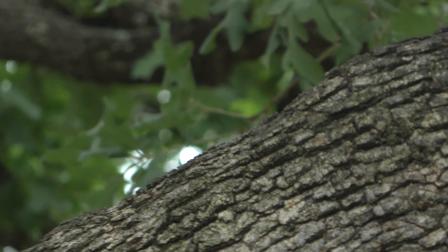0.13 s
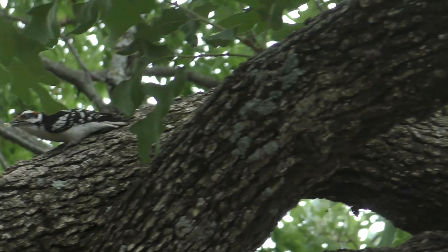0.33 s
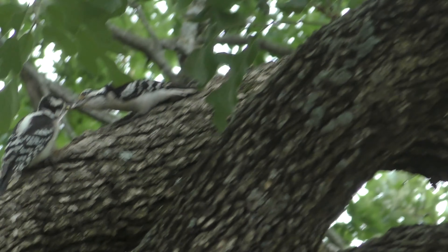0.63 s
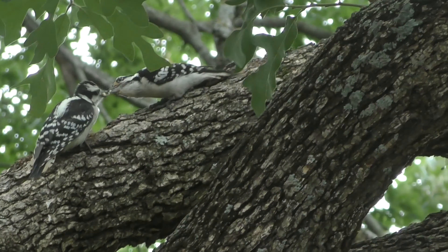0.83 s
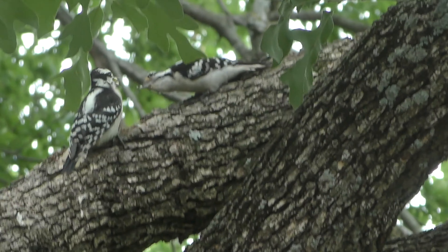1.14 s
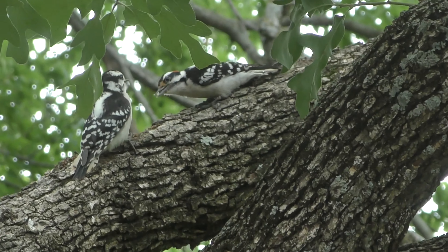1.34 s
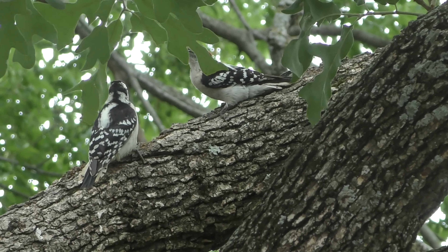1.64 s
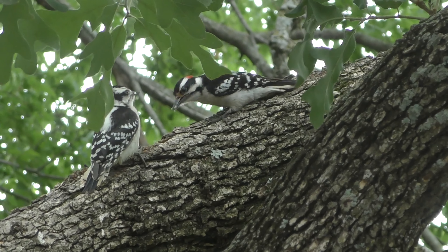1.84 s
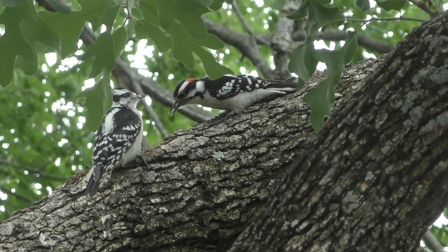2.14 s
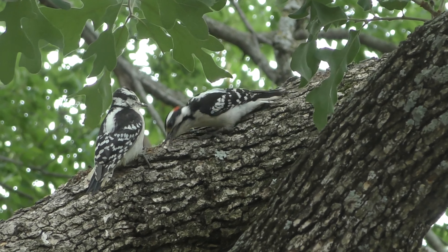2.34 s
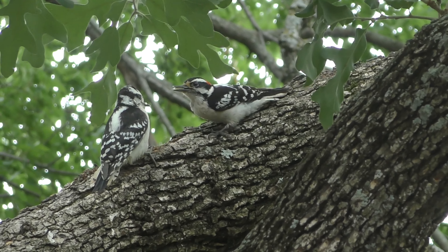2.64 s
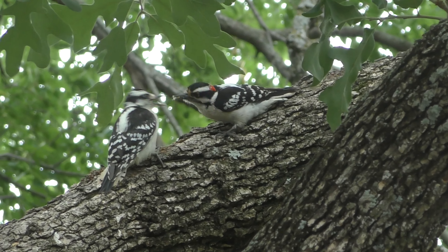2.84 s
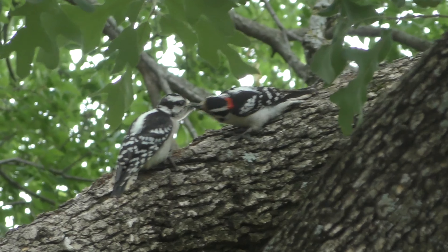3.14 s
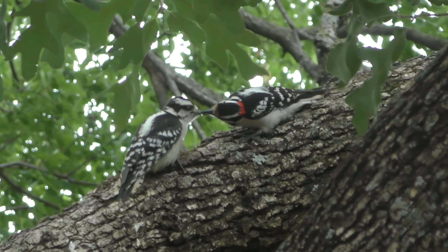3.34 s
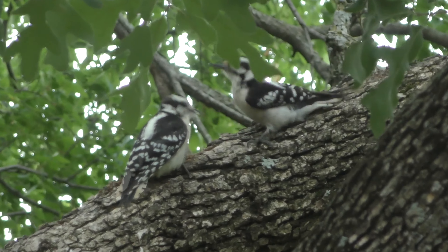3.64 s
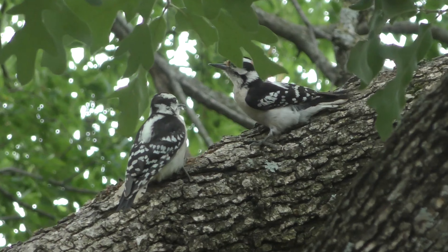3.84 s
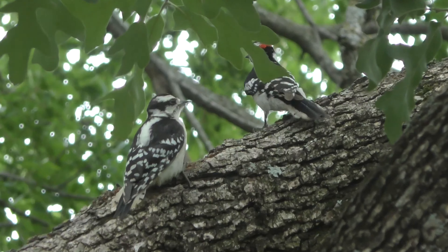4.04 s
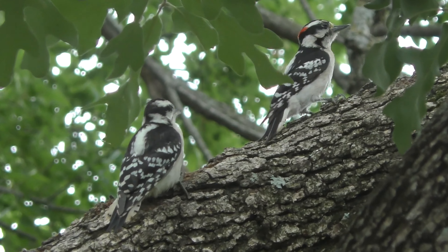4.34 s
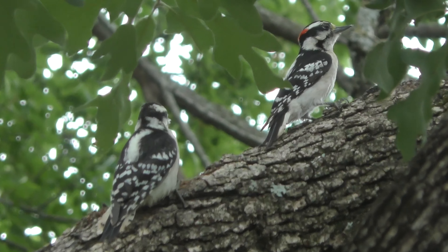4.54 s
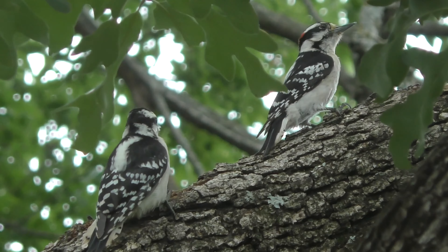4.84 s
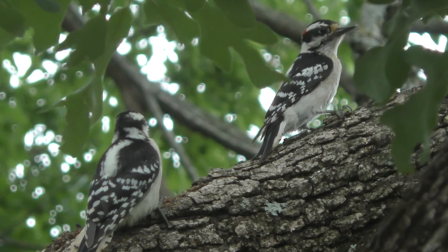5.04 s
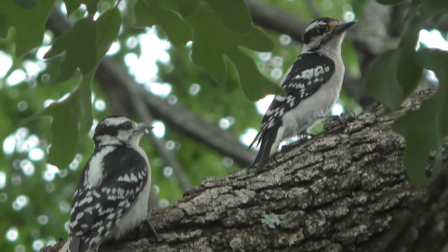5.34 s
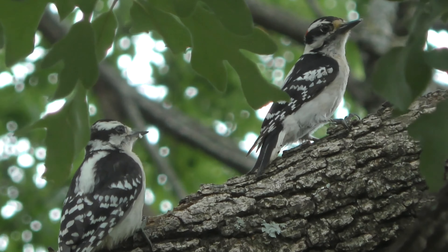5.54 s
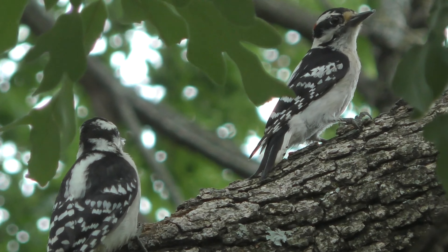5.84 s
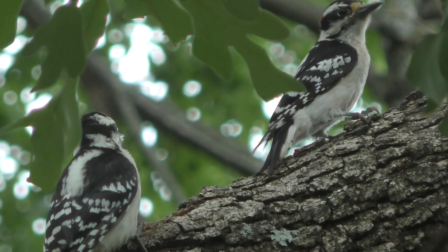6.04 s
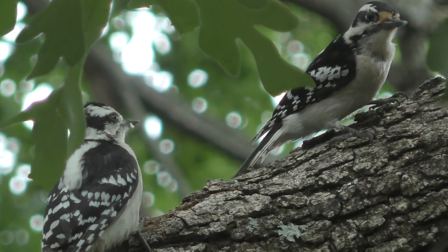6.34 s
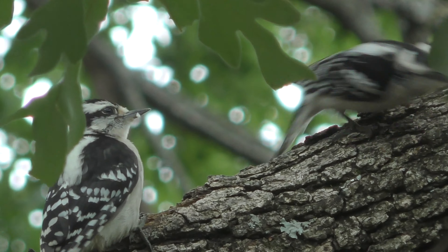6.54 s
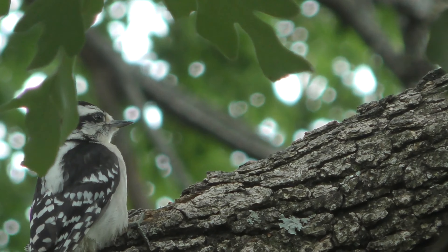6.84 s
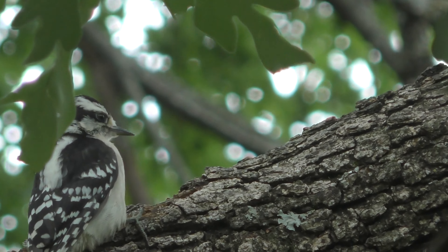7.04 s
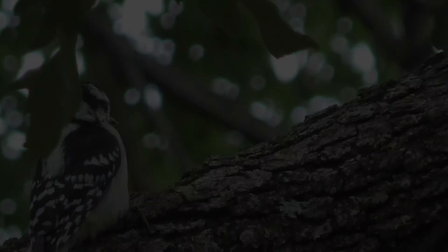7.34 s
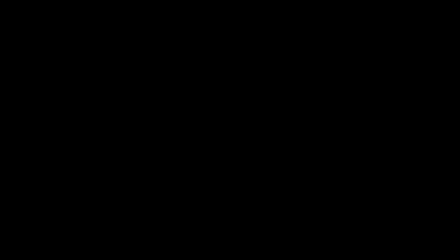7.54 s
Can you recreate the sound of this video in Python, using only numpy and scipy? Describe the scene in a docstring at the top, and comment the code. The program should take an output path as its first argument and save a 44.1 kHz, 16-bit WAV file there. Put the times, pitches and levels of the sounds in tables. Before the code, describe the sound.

Outdoors in a leafy tree, a young woodpecker begs with very short, high, arched chirps, many opening with a rough squeak. They come irregularly, crowd together near the middle, then grow sparser and weaker. A songbird farther off to the right whistles quick rising slurs, mostly near the end. Low murmur, leaf rustle and a faint machine hum lie behind; the handled camera clicks twice.

```python
"""Begging young woodpecker

A young woodpecker begs on an oak limb: short arched harmonic chirps, many opening with a rough squeak,
scattered by trunk and leaves. Farther off to the right a songbird whistles rising sine slurs. Thin buzzy
notes are frequency-modulated sines; the first is the falling end of the fledgling's opening chirp.
A distant machine's hum lines lie under shaped-noise outdoor air; the camera clicks twice as it is
handled, each time as noise cracks and case resonances."""
import sys
import numpy as np
from scipy import signal
from scipy.fft import rfft, irfft, next_fast_len
from scipy.io import wavfile
from scipy.ndimage import map_coordinates

SR = 44100
rng = np.random.default_rng(int(sys.argv[2]) if len(sys.argv) > 2 else 0)


def unload_wav(signal):
    """Save mono or channel-first audio to the path in sys.argv[1] as 16-bit WAV at rate SR, clipped to [-1, 1]."""
    wavfile.write(
        sys.argv[1],
        SR,
        np.round(np.clip(np.atleast_2d(signal).T, -1, 1) * 32767).astype(np.int16),
    )


N = 339570  # length in samples


def amp(db):
    """Level law: decibels to amplitude gain."""
    return 10 ** (np.asarray(db) / 20)


def unit(x):
    """Normalization: scale a signal to rms 1."""
    return x / np.sqrt(np.mean(x ** 2) + 1e-20)


def along(points, hz):
    """Interpolation of (frequency, value) points along a logarithmic frequency axis."""
    f, v = np.transpose(points)
    return np.interp(np.log(hz + 1), np.log(f + 1), v)


def curves(rows):
    """Interpolation in time: one value per sample for each column after the time."""
    s, *cols = np.transpose(rows)
    return [np.interp(np.arange(N) / SR, s, c) for c in cols]


def wobble(rate, size=N):
    """Band-limited fluctuation: a smooth random curve through rate knots a second."""
    knots = rng.standard_normal(int(size * rate / SR) + 4)
    return map_coordinates(knots, [np.arange(size) * rate / SR])


def filtered(x, response):
    """Linear filtering: the spectrum times a response of frequency."""
    m = next_fast_len(N + SR // 2)
    spectrum = rfft(x, m) * response(np.fft.rfftfreq(m, 1 / SR))
    return irfft(spectrum, m)[..., :N]


def pan(left_db):
    """Interchannel level difference: two gains, the left above the right by left_db."""
    return amp([[left_db / 2], [-left_db / 2]])


def add(track, s, sound):
    """Superposition: mix a sound into a track at time s."""
    part = track[max(round(s * SR), 0):][:len(sound)]
    part += sound[:len(part)]


def scatter(x, t60, width):
    """Diffuse scattering: dense decaying echoes off bark and leaves; width is their side share."""
    t = np.arange(SR // 2) / SR
    envelope = amp(-60 * t / t60) * (1 - np.exp(-t / 0.0042))
    tails = rng.standard_normal((2, len(t))) * envelope
    tails /= np.linalg.norm(tails[0])  # the mid tail has energy 1
    mid, side = signal.fftconvolve(x[None], tails, axes=1)[:, :N]
    return np.array([mid + width * side, mid - width * side]) / np.hypot(1, width)


def warble(length, centre_hz, swing, rate):
    """Frequency modulation: a tone of about rms 1 whose pitch darts randomly about its centre."""
    pitch_hz = centre_hz * np.exp(swing * wobble(rate, int(length * SR) + 1))
    return np.sqrt(2) * np.sin(2 * np.pi * np.cumsum(pitch_hz) / SR)


def chirp(length, top_hz, bright_db):
    """Source and filter: a pitch leaps up, holds and drops, sweeping five harmonics through the throat."""
    # arch of one chirp: length_share, pitch_share (of top pitch), level_db (relative)
    arch_points = [(0, .8, -0.5), (.13, 0.96, -3), (.3, .98, 2.5), (.55, 0.99, 4), (.75, .99, 4),
                   (.88, .92, 2.5), (1, 0.74, -11)]
    # resonance of throat and open bill: frequency_hz, level_db
    throat = [(2200, 0), (2750, -14), (3100, -8.5), (4000, 6.5), (4800, 1.5), (5500, -3), (6200, -2.5),
              (7200, -2), (8200, -3.5), (9300, -6.5), (10600, -16.5), (12400, -24.5), (14000, -42),
              (15500, -44)]
    jitter, flutter_db, leg_db = 0.012, 3.5, 9  # pitch share, level spread, purity of the arch's legs
    size = int(length * SR)
    u = np.linspace(0, 1, size)
    share, bend, swell_db = np.transpose(arch_points)
    arch = np.interp(u, share, bend)
    pitch_hz = top_hz * arch * (1 + jitter * wobble(1159, size))
    phase = 2 * np.pi * np.cumsum(pitch_hz) / SR
    # on the way up and down the second harmonic gains on the others
    purity_db = leg_db * (1 - arch)
    tone = np.zeros(size)
    for k in range(1, 6):
        harmonic_db = along(throat, k * pitch_hz) + bright_db * (k - 2) - purity_db * abs(k - 2)
        tone += amp(harmonic_db) * np.sin(k * phase)
    level_db = np.interp(u, share, swell_db) + flutter_db * wobble(287, size)
    return unit(tone * amp(level_db) * signal.windows.tukey(size, .08))


def squeak(length, db):
    """Random frequency modulation: a rough high squeak swells and dies away; a harder one is higher."""
    firm_hz, firm_db = 8270, -42.5  # centre pitch of a firm squeak, and its level
    rise = 0.022  # octaves per dB of effort
    tone = warble(length, firm_hz * 2 ** (rise * (db - firm_db)), swing=0.132, rate=1600)
    u = np.linspace(0, 1, len(tone))
    return tone * np.interp(u, [0, .2, .55, 1], [.05, 0.76, 1.24, 0.64])


def among_limbs(call, near_db, near_t60, far_db, far_t60, width):
    """Multipath: limbs and leaves smear a call, keeping its mid energy; paths shift as the head moves."""
    t = np.arange(SR // 3) / SR

    def fade(t60):
        """Exponential decay after a soft onset, scaled to energy 1."""
        return unit(amp(-60 * t / t60) * (1 - np.exp(-t / 0.0012))) / np.sqrt(len(t))

    # limbs: separate reflections, 1500 a second on average
    limbs = unit(rng.standard_normal((2, len(t))) * (rng.random((2, len(t))) < 1500 / SR))
    # leaves: dense and duller
    leaves = unit(signal.lfilter([1, 1], 1, rng.standard_normal((2, len(t)))))
    paths = limbs * amp(near_db) * fade(near_t60) + leaves * amp(far_db) * fade(far_t60)
    paths[0, 0] += 1  # the direct path
    mid, side = signal.fftconvolve(call[None], paths, axes=1)
    smeared = np.array([mid + width * side, mid - width * side])
    return smeared * np.linalg.norm(call) / np.linalg.norm(mid)


def fledgling():
    """Two voice regimes: a rough high squeak often gives way to a locked harmonic pitch."""
    # begging chirps: start_s, length_s, top_pitch_hz, level_db, brightness_db (per harmonic)
    chirps = [ (0.000, 0.0099, 2794, -39, -3), (0.036, 0.024, 2703, -40.5, 3.5),
              (.342, 0.031, 3133, -40.5, 7.5), (.447, 0.051, 3145, -35.5, 5), (0.618, .04, 3072, -41, -1),
              (.817, 0.03, 3025, -42, -1), (1.017, .04, 3065, -37.5, 1), (1.589, .034, 2940, -42, 0),
              (1.804, 0.035, 2850, -57, -4), (1.987, 0.044, 3090, -42.5, 2.5),
              (2.256, 0.043, 3124, -38.5, 1.5), (2.563, 0.018, 2750, -54.5, -0.5),
              (2.733, 0.037, 3137, -35, 3), (2.885, 0.043, 3260, -34.5, 7), (3.046, 0.035, 3103, -34, 2),
              (3.114, .052, 3060, -44, 0.5), (3.309, 0.018, 3110, -57.5, -4.5),
              (3.449, 0.018, 3030, -44, -1.5), (3.663, 0.021, 3073, -41, 2), (4.068, .04, 3095, -42, 0.5),
              (4.365, 0.02, 2704, -49.5, -0.5), (5.01, 0.032, 2857, -53, -2.5),
              (5.317, 0.031, 2877, -51, -1.5), (5.713, .028, 2734, -50, 1), (6.21, 0.039, 2856, -46.5, -4),
              (6.463, 0.037, 2735, -50, 1.5), (6.668, 0.03, 2748, -44, 3)]
    # rough squeaks, mostly running into a chirp: start_s, length_s, level_db
    squeaks = [(0.434, 0.025, -43), (0.601, 0.033, -43), (0.797, 0.03, -46), (0.988, 0.051, -46.5),
               (1.389, 0.036, -55), (1.578, 0.023, -53.5), (2.238, 0.02, -61), (2.719, 0.017, -52.5),
               (2.872, 0.036, -43), (3.035, 0.027, -40), (3.264, 0.032, -58), (3.425, 0.051, -48.5),
               (3.654, 0.032, -49.5), (4.353, .023, -56.5), (6.641, 0.039, -59.5)]
    calls = []
    for s, length, top_hz, db, bright_db in chirps:
        calls.append((s, amp(db) * chirp(length, top_hz, bright_db)))
    for s, length, db in squeaks:
        calls.append((s, amp(db) * squeak(length, db)))
    track = np.zeros((2, N))
    for s, call in calls:
        heard = among_limbs(call, near_db=1, near_t60=0.13, far_db=-2.0, far_t60=0.21, width=0.24)
        for channel, sound in zip(track, heard):
            add(channel, s, sound)
    return track


def rush(spectrum):
    """Partial coherence: stereo noise of rms 1 whose left-right likeness depends on frequency."""
    # left-right likeness: frequency_hz, correlation
    alike = [(40, 0.45), (100, 0.23), (300, 0.85), (700, 0.67), (1400, 0.44), (3000, 0.33), (7000, 1),
             (15000, 0.52)]

    def mid_side(hz):
        """Split of power between mid and side that yields the wanted correlation."""
        turn = np.arccos(np.clip(along(alike, hz), -1, 1)) / 2
        return amp(along(spectrum, hz)) * np.array([np.cos(turn), np.sin(turn)])

    mid, side = filtered(rng.standard_normal((2, N)), mid_side)
    return unit(np.array([mid + side, mid - side]))


def hum_line(hz, drift_hz):
    """Slow frequency modulation: one slightly drifting sine of rms 1."""
    pitch_hz = hz + drift_hz * wobble(12)
    return unit(np.sin(2 * np.pi * np.cumsum(pitch_hz) / SR))


def background():
    """Tones in noise: a far machine's unsteady hum lines in a shaped murmur of town and leaves."""
    # outdoor air, before the layer trims: time_s, murmur_level_db, rustle_level_db
    air = [(0.0, -62.5, -67.5), (0.41, -59, -68), (0.71, -54, -61), (1.2, -55.5, -61.5), (2.72, -57, -65),
           (3.02, -56, -61.5), (5.17, -60, -66), (5.7, -60, -63.5), (6.13, -61, -65), (6.67, -56.5, -62.5),
           (7.14, -56.5, -62), (7.7, -65, -69.5)]
    # spectral density of the low murmur: frequency_hz, relative_level_db (per Hz)
    murmur_spectrum = [(25, -40), (55, -16.5), (80, -31), (100, -5.5), (130, -5), (160, -5), (225, -1),
                       (330, -0.5), (420, -1.5), (560, -11.5), (700, -12), (1040, -43.5)]
    # spectral density of the rustle: frequency_hz, relative_level_db (per Hz)
    rustle_spectrum = [(400, -51), (650, -4), (850, -3.5), (1250, 1.5), (1700, -2.5), (2500, -6),
                       (4000, -12), (6000, -20.5), (8600, -25), (9600, -19), (10600, -30), (14400, -48),
                       (15400, -55)]
    # swell of the hum's deepest line, before its trim: time_s, level_db
    drone = [(0.0, -68), (0.28, -77), (0.39, -78), (0.88, -63.5), (1.46, -65), (1.59, -73), (2.1, -73.5),
             (2.87, -77.5), (5.9, -72.5), (6.05, -72), (6.5, -67.5), (7.36, -74.5), (7.7, -85)]
    # the machine's upper hum lines, before their sway: pitch_hz, level_db
    upper_lines = [(157.5, -70), (209.5, -71.5), (237, -68), (315, -70.5), (419.5, -71.5)]
    murmur_trim_db, rustle_trim_db, drone_trim_db = .5, 3, 2
    murmur_db, rustle_db = curves(air)
    drone_db, = curves(drone)
    deep = amp(drone_trim_db + drone_db + 3.0 * wobble(6.1)) * hum_line(105.9, drift_hz=1.1)
    upper = sum(amp(db + 3.2 * wobble(5.5)) * hum_line(hz, drift_hz=1.47) for hz, db in upper_lines)
    # the upper lines swell with the murmur
    upper = upper * amp(0.93 * (murmur_db - np.median(murmur_db)))
    hum = deep + pan(-0.81) * upper
    murmur = pan(-2.2) * amp(murmur_db + murmur_trim_db) * rush(murmur_spectrum)
    rustle = pan(-1.8) * amp(rustle_db + rustle_trim_db) * rush(rustle_spectrum)
    return hum + murmur + rustle


def thin_notes():
    """Fast frequency modulation: thin buzzy notes dart about their pitch."""
    # thin buzzy notes; the first, at 0.05 s, is the falling end of the fledgling's opening chirp:
    # start_s, length_s, pitch_hz, level_db
    buzzes = [(0.05, 0.013, 3770, -51), (0.079, 0.043, 4110, -68), (0.178, 0.043, 4270, -64.5),
              (0.264, 0.074, 4200, -65.5), (6.488, 0.046, 6950, -65.5), (6.748, 0.11, 6910, -65),
              (7.031, 0.11, 6870, -65.5), (7.174, .02, 7480, -68), (7.266, 0.089, 6860, -64),
              (7.501, 0.083, 7010, -70)]
    swing_hz = 210  # typical excursion about the pitch
    track = np.zeros(N)
    for s, length, hz, db in buzzes:
        buzz = warble(length, hz, swing=swing_hz / hz, rate=900)
        add(track, s, amp(db) * buzz * signal.windows.tukey(len(buzz), .5))
    return track


def songbird():
    """Sine glides: pure rising slurs that swell as they go, each after a soft held lead-in."""
    # slurs: start_s, length_s, first_pitch_hz, last_pitch_hz, bow (1 straight, more rises early), level_db
    slurs = [ (.180, 0.094, 2325, 2384, 1, -62.5), (0.304, .03, 2303, 2820, 0.93, -51.5),
             (4.138, 0.18, 2462, 3290, .77, -59.5), (6.102, .21, 2262, 3180, 0.98, -55.5),
             (6.564, .03, 1928, 1972, 2.3, -49), (6.835, 0.078, 1867, 2360, 2.3, -50),
             (7.12, .085, 1834, 2435, 1.9, -49), (7.364, 0.058, 1750, 2376, 1.57, -50.5),
             (7.588, 0.057, 1793, 2400, 1.3, -55.5)]
    lead_share, swell_db, waver = .3, 2, 0.011  # lead-in / slur length, rise in level, pitch share
    track = np.zeros(N)
    for s, length, first_hz, last_hz, bow, db in slurs:
        lead = lead_share * length
        t = np.arange(int((lead + length) * SR)) / SR - lead
        u = np.clip(t / length, 0, 1)
        glide_hz = last_hz + (first_hz - last_hz) * (1 - u) ** abs(bow)
        pitch_hz = glide_hz * (1 + waver * wobble(300, len(t)))
        onset_db = np.interp(t, [-lead, 0, .014], [-20, -9, 0])
        level_db = db + onset_db + swell_db * (u - .5)
        tone = np.sqrt(2) * np.sin(2 * np.pi * np.cumsum(pitch_hz) / SR)
        add(track, s - lead, amp(level_db) * tone * signal.windows.tukey(len(t), .2))
    return track


def scattered_notes():
    """Reverberation: thin notes gain dense echoes; distant song also has a distinct one after 46 ms."""
    thin = thin_notes()
    song = filtered(songbird(), lambda hz: 1 + amp(-8.0) * np.exp(-2j * np.pi * hz * 0.046))
    early = amp(2.0) * scatter(song, t60=0.071, width=1.1)
    late = amp(-4.0) * scatter(song, t60=0.52, width=0.4)
    right = pan(-8.5) * (song + early + late)
    return right + thin + amp(0.6) * scatter(thin, t60=0.26, width=0.16)


def handling():
    """Impulse response: a short noise crack, damped case resonances and a dull scattered rattle."""
    # handling clicks, in two close pairs: start_s, crack_level_db, knock_level_db (of the case)
    clicks = [(0.724, -43.5, -59), (0.731, -81, -44), (6.196, -51, -56.5), (6.221, -50, -60)]
    # resonances of the camera case: frequency_hz, relative_level_db, t60_s
    case = [(850, -31, 0.024), (1003, 0.5, 0.048), (1383, -6, 0.022), (1790, 1.5, 0.029), (2780, 6, 0.016)]
    track, t = np.zeros(N), np.arange(SR // 5) / SR
    for s, db, knock_db in clicks:
        crack = amp(db - 60 * t / 0.055) * rng.standard_normal(len(t))
        ring = sum(amp(level - 60 * t / t60) * np.sin(2 * np.pi * hz * t) for hz, level, t60 in case)
        add(track, s, crack + amp(knock_db) * ring)
    # both paths are dulled by first-order low-pass filters
    direct = filtered(track, lambda hz: 1 / (1 + 1j * hz / 5000))
    rattle = filtered(scatter(track, t60=0.08, width=0.69), lambda hz: 1 / (1 + 1j * hz / 3000))
    return pan(-4) * (direct + amp(4.0) * rattle)


def scene():
    """Superposition: all sources add up under one common level."""
    # all sound dips briefly: time_s, level_db
    dip = [(.338, -3.5), (.348, -21), (.375, -11), (.43, 0)]
    return amp(curves(dip)[0]) * (fledgling() + background() + scattered_notes() + handling())


def record(dry):
    """Band limiting: the camera cuts the deep bass and keeps nothing above its top frequency."""
    bass_hz, top_hz = 70, 15700  # half amplitude at bass_hz
    return filtered(dry, lambda hz: (hz < top_hz) * (1 - 1 / (1 + (hz / bass_hz) ** 4)))


dry = scene()
out = record(dry)
unload_wav(out)
```